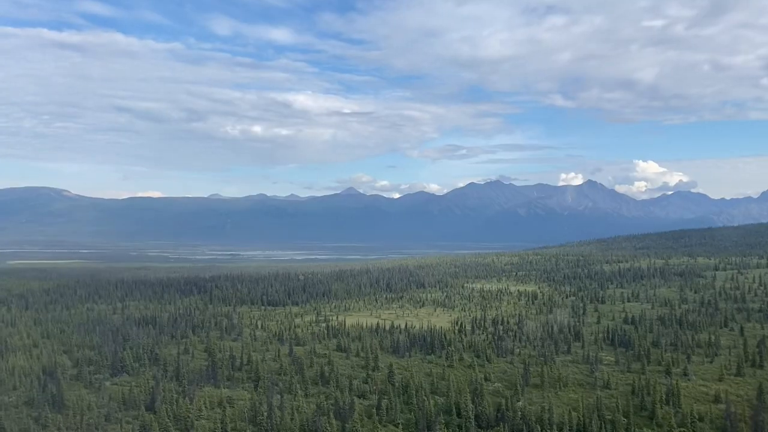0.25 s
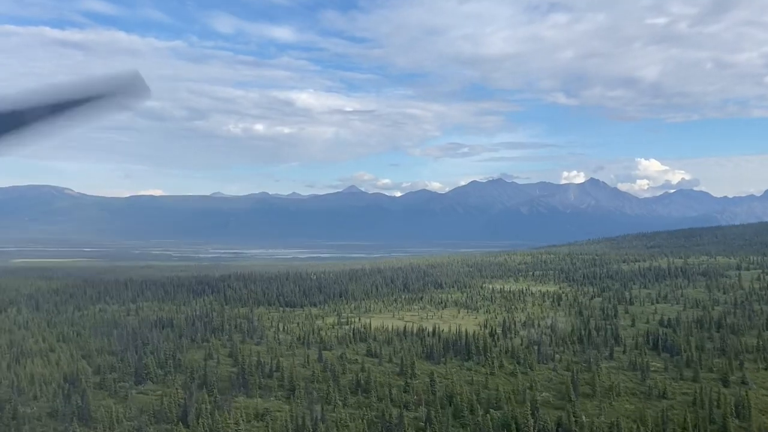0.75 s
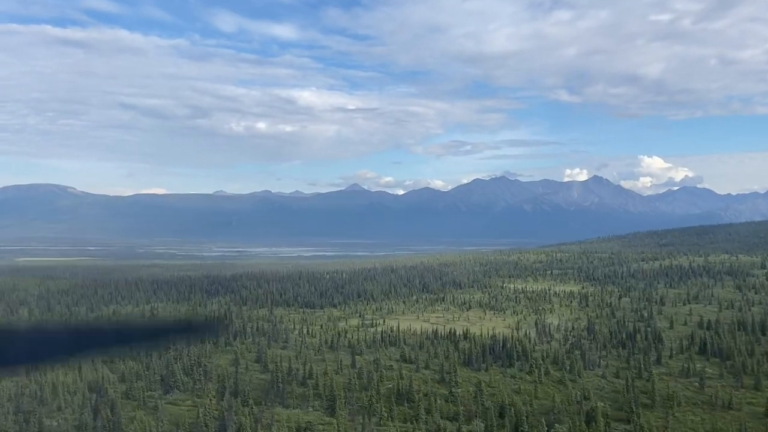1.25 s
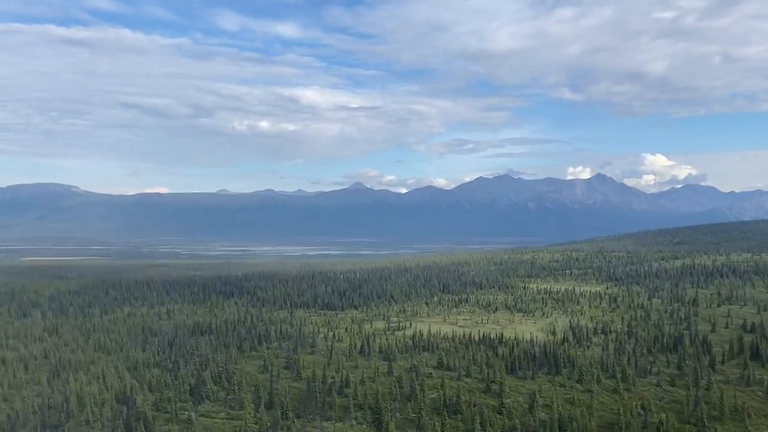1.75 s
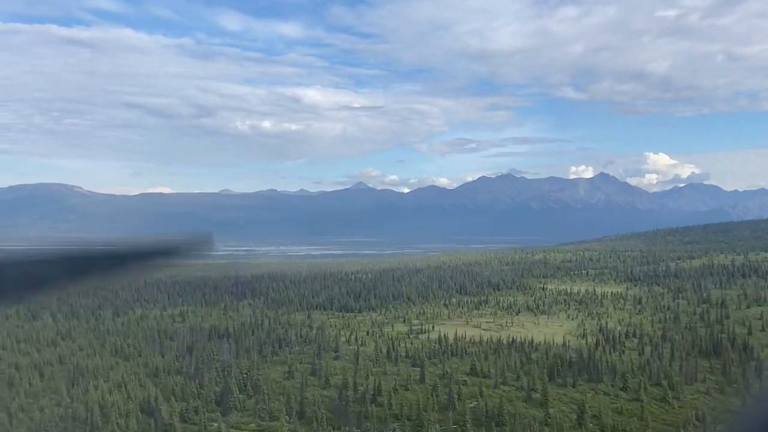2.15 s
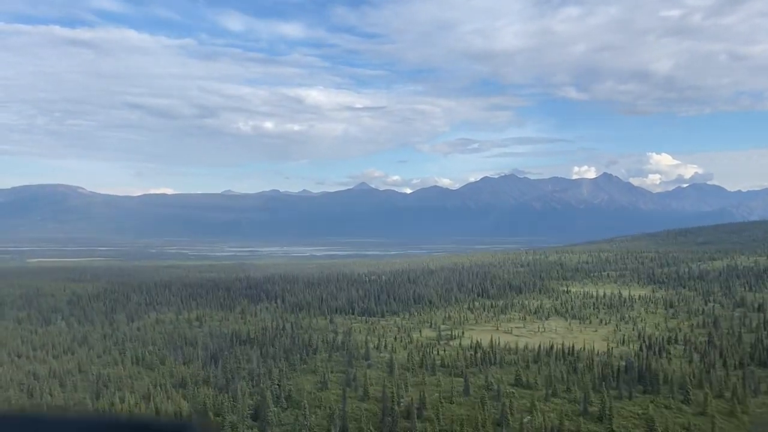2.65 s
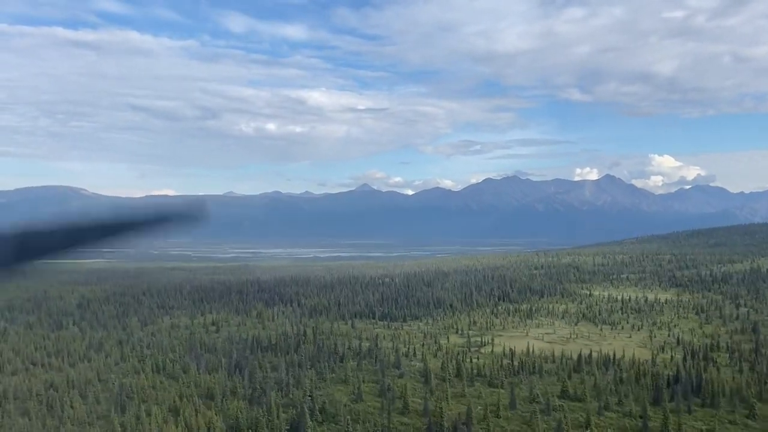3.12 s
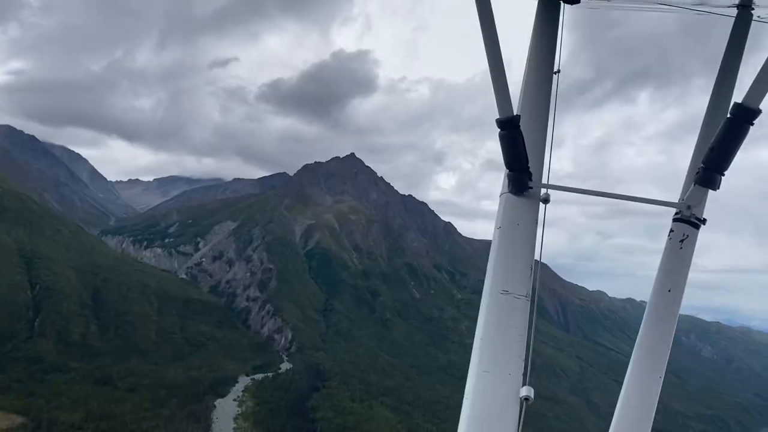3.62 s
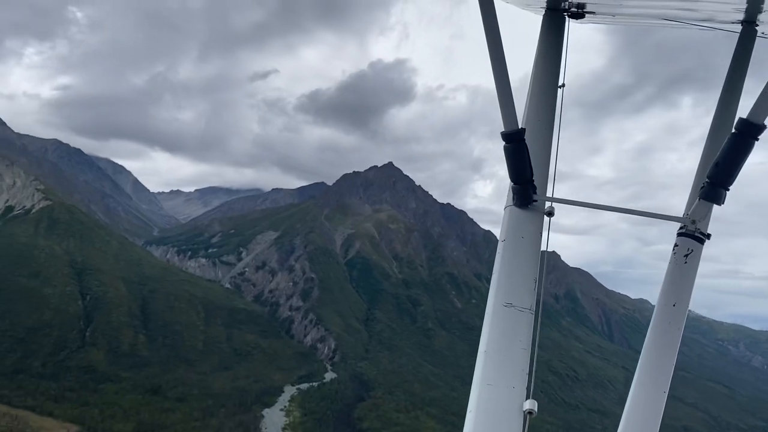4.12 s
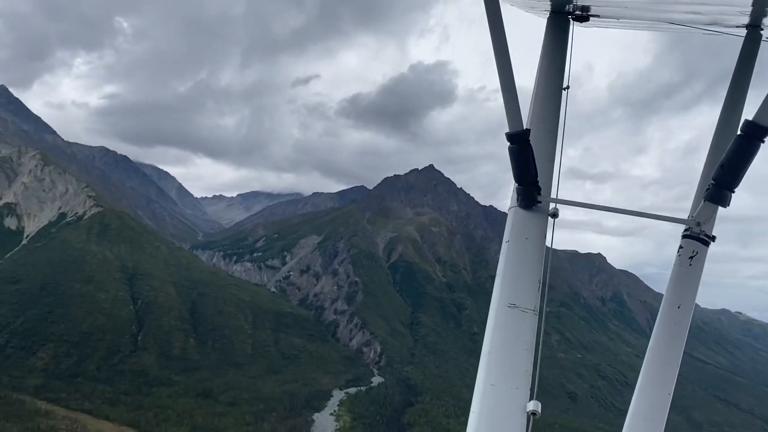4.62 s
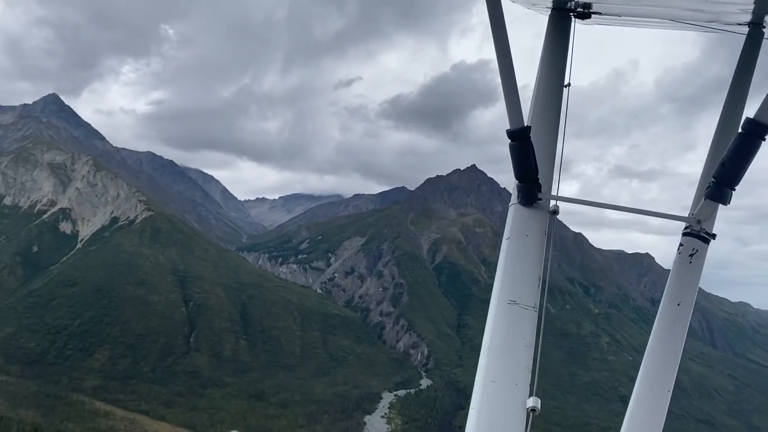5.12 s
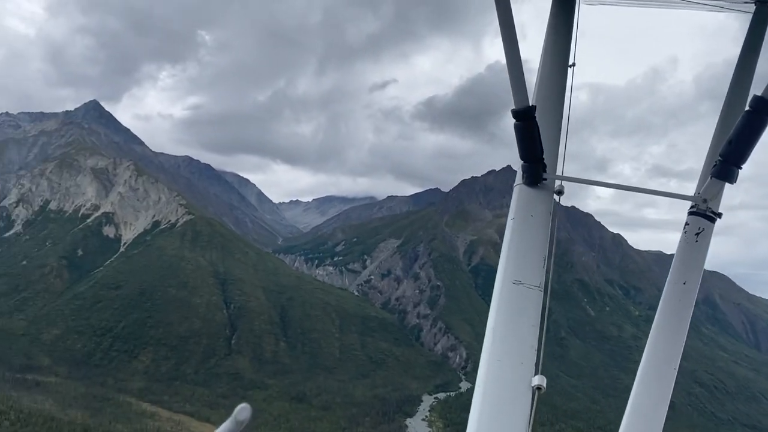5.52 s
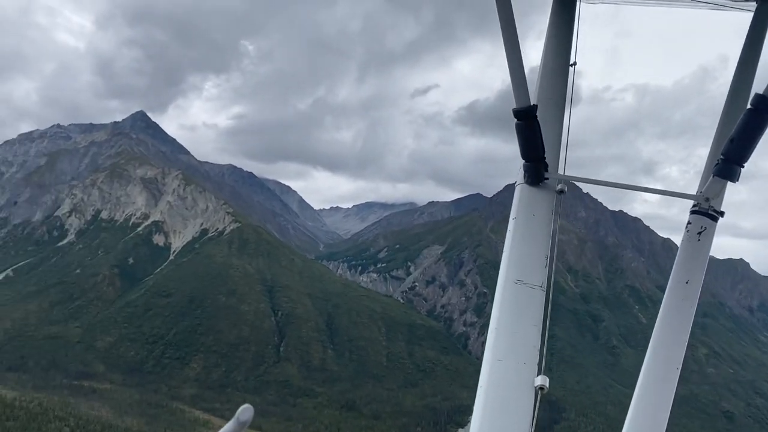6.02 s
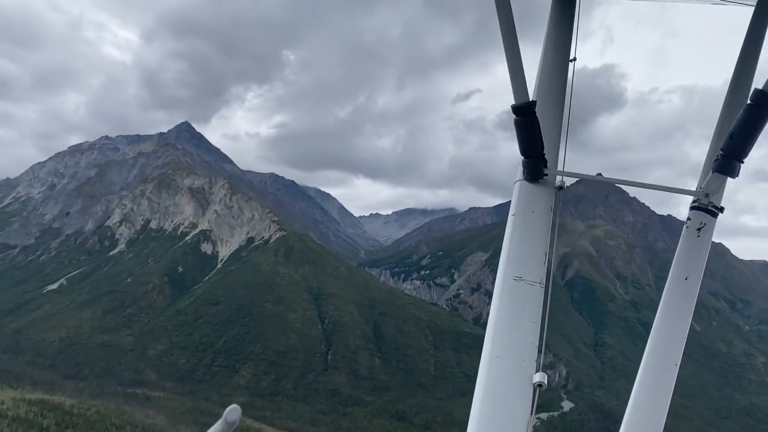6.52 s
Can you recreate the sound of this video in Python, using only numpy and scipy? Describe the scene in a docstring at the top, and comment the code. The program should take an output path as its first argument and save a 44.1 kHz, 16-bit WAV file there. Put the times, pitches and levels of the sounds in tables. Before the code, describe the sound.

From the start, a small piston-engine propeller plane is heard in flight from inside the cabin, in stereo, close behind the engine. Its deep, steady drone sits over rumbling air buffeting, a rough exhaust roar, faintly ringing window panes and a thin hiss from the seals. At about 3.4 seconds the sound cuts without a gap to a slightly faster, higher and thinner drone, with a slightly softer hiss. From here a loose fitting chatters rapidly, very high and fine, with scattered sharper ticks that are strongest between about 5.7 and 6.3 seconds. Near 5.4 seconds a jolt of rough air makes one short, low boom with a dull panel knock. The buffeting swells briefly around 5.8 seconds, and the engine drones on steadily until the end, at about 7 seconds.

```python
"""A stereo microphone in the cabin of a small four-cylinder propeller plane, close behind the engine.
First, low over forest: firings and blade passes make a deep drone, with buffeting air, exhaust roar,
ringing panes and the hiss of the seals under it. At 3.4 s the scene cuts to cruise among mountains:
a slightly faster, thinner drone with a slightly softer, thinner hiss of draught, while a loose fitting
chatters and ticks. Near 5.4 s a jolt of rough air booms and knocks the panels; the drone carries on."""
import sys
import numpy as np
from scipy import signal
from scipy.fft import rfft, irfft, next_fast_len
from scipy.io import wavfile
from scipy.ndimage import uniform_filter1d, minimum_filter1d

SR = 44100
rng = np.random.default_rng(int(sys.argv[2]) if len(sys.argv) > 2 else 0)


def wav_record(signal):
    """Record a signal, one row per channel, as 16-bit PCM in the file named by sys.argv[1]."""
    frames = np.transpose(np.atleast_2d(signal))
    bounded = np.clip(frames, -1, 1)
    # unit amplitude maps onto the largest positive 16-bit level
    quanta = np.round(bounded * 32767).astype(np.int16)
    wavfile.write(sys.argv[1], SR, quanta)


N = 298557
T = np.arange(N) / SR


def from_db(db):
    """Decibels to gain."""
    return 10 ** (np.asarray(db) / 20)


def in_time(rows):
    """A control curve at every sample."""
    return np.interp(T, *np.transpose(rows))


def drift(rate):
    """Smooth chance of spread 1 that changes about rate times a second."""
    step = 40   # samples
    pole = np.exp(-2 * np.pi * rate * step / SR)
    chance = rng.standard_normal(N // step + 2002)
    slow = signal.lfilter([1], [1, -2 * pole, pole * pole], chance)[2000:]
    return np.interp(np.arange(N) / step, np.arange(len(slow)), slow / slow.std())


def pan(db):
    """Left and right gains for a level difference, at constant power."""
    gains = from_db(np.array([[db], [-db]]) / 2)
    return gains / np.sqrt(np.mean(gains ** 2))


def colour(table, hz, mid, side):
    """Left and right spectra with the table's level and likeness; silent outside its range."""
    points, level_db, likeness = np.transpose(table)
    log_hz = np.log(np.maximum(hz, 1))
    gain = from_db(np.interp(log_hz, np.log(points), level_db)) * (hz >= points[0]) * (hz < points[-1])
    alike = np.clip(np.interp(log_hz, np.log(points), likeness), -1, 1)
    return gain * (np.sqrt((1 + alike) / 2) * mid + np.sqrt((1 - alike) / 2) * side * [[1], [-1]])


def air_noise(table, low_hz, high_hz, lag_s=0, right_gain=1):
    """A band of turbulence shaped by the table; it reaches the microphone's right side lag_s later."""
    size = next_fast_len(N)
    hz = np.arange(size // 2 + 1) * SR / size
    held = [(1, *table[0][1:]), *table, (SR, *table[-1][1:])]
    spectrum = colour(held, hz, *rfft(rng.standard_normal((2, size))))
    spectrum[1] *= right_gain * np.exp(-2j * np.pi * hz * lag_s)
    return irfft(spectrum * (hz >= low_hz) * (hz < high_hz), size)[:, :N] * np.sqrt(SR / 2)


# The engine at cruise. Each row: time in seconds, speed in revolutions per minute.
FOREST_RPM = [(0, 2304), (1.54, 2292), (1.91, 2290), (2.35, 2293), (2.66, 2289), (3.4, 2288)]
MOUNTAIN_RPM = [(3.45, 2377), (4.89, 2376), (5.55, 2386), (5.98, 2384), (6.76, 2374)]

def engine_cycles(rpm, wobble_rpm):
    """Count of four-stroke cycles, two crank turns each; uneven burning shakes the speed a little."""
    return np.cumsum(in_time(rpm) + wobble_rpm * drift(8)) / (120 * SR)


# Firings and blade passes, heard from the cabin. Each row: harmonic of the firing rate, level in dB,
# lower and upper sideband in dB against the tone, left over right in dB, left lead in radians.
FOREST_TONES = [(1, -21.4, -15, -21, 1, -0.68), (2, -36, 0, -6, 2, 0), (3, -24.5, -13, -9, 7, 0),
                (4, -35, -11.5, -5, 2.5, .5), (5, -41, -5, -4, 2, 0), (7, -42.5, -8.5, -4.5, -6.5, 0.5),
                (8, -38.3, -5, -10, -14, -2.5), (10, -47, -11, -4.5, -16, -1.5)]
MOUNTAIN_TONES = [(1, -32.5, -11, -15, -1.5, 1.7), (2, -24.5, -13, -9.5, -1.5, 0.07),
                  (3, -36.5, -6, -11, -2, 0.23), (4, -48, -9, -6, -4, 1.7), (5, -43, -9, -10, 2, 0.27),
                  (10, -52.5, -14, -10, 4, 1.4)]
# Cabin resonances at the microphone. Each row: centre in Hz, width in Hz, level of a line at the
# centre in dB, left over right in dB, left lead in radians.
FOREST_CABIN = [(125.4, 24, -37, 4, 0.5), (325, 14, -40.5, 2, 0), (401.6, 15, -38.5, 5, 0),
                (587, 35, -46, 5, 0.8), (668.8, 14, -47, -6, 1), (810.5, 26, -45.5, -3.5, 2.5),
                (859.5, 18, -43.9, -4, 1), (948, 25, -49, -11, -1.5), (1052, 21, -52.5, -10, 1),
                (1130, 79, -50, -8, 2.5), (1215, 28, -48.5, 5, 0), (1308, 28, -49, -1, -1.5),
                (1376, 24, -57, -11, 1.5), (1494, 17, -49, 9, -1), (1528, 20.1, -54.5, 6, 1),
                (1662, 18, -53.5, 4, -1.2), (1702, 16, -56.5, 0, 0)]
MOUNTAIN_CABIN = [(511.4, 41, -44, -1.5, 1.75), (594.2, 23, -46.5, 5, .7), (653.8, 40, -48.5, 6, 1.1),
                  (714.3, 14, -57, 7, .5), (853, 14, -56, 0, .5), (892, 16, -54.5, -5, 1.4),
                  (1040, 65, -54, 0, .3), (1161.7, 26, -53, 1, 2.8), (1263.4, 80, -52.5, 0, 0.43),
                  (1348, 22, -47.2, -7, 0.54), (1507, 16, -56, -4, 2.5), (1604, 22, -57.5, 0, 2),
                  (1775, 30, -56.5, 10, 1.3), (1875, 20, -51.5, -6, 0.73), (1945, 40, -57, -16, 1.1)]

def engine_orders(rpm, tones, cabin):
    """The strong lines: firing tones, sidebands from unequal cylinders, and lines the cabin lifts."""
    cycle_hz = in_time(rpm).mean() / 120
    lines = []
    for harmonic, db, below_db, above_db, *place in tones:
        multiple = 4 * round(harmonic)   # four firings per cycle
        for offset, relative_db in ((0, 0), (-1, below_db), (1, above_db)):
            lines.append((multiple + offset, db + relative_db, *place))
    for hz, width_hz, db, *place in cabin:
        for multiple in range(int((hz - width_hz) / cycle_hz) + 1, int((hz + width_hz) / cycle_hz) + 1):
            detuning = 2 * (multiple * cycle_hz - hz) / width_hz
            lines.append((multiple, db - 10 * np.log10(1 + detuning ** 2), *place))
    return list({line[0]: line for line in sorted(lines)}.values())   # each line's strongest path


def drone(cycles, orders, waver_db, rough, beat_smear):
    """Engine and propeller lines; weak ones waver most, high ones flare from firing to firing."""
    out = np.zeros((2, N))
    span = 25   # neighbouring lines that flare together
    burns = [drift(36) for _ in range(orders[-1][0] // span + 1)]
    loudest_db = max(row[1] for row in orders)
    phase, previous = 0, 0
    for multiple, line_db, pan_db, lead in orders:
        weakness = np.clip((loudest_db - line_db) / 20, .15, 1)
        flare = 1 + rough * min(multiple / 65, 1) * burns[multiple // span]
        gain = from_db(line_db + waver_db * weakness * drift(0.98)) * flare
        if multiple > 22:
            smear = .27   # upper lines bunch loosely into the burst of the hardest cylinder
        elif multiple == previous + 1:
            smear = beat_smear   # when small, sidebands follow their tone and it throbs
        else:
            smear = 1   # each low tone takes its own path
        phase += smear * rng.standard_normal()
        previous = multiple
        angle = 2 * np.pi * ((multiple * cycles + phase) % 1) + np.array([[lead], [-lead]]) / 2
        out += pan(pan_db) * gain * np.sqrt(2) * np.cos(angle)
    return out


# The engine's weaker lines. Each row: frequency in Hz, level per line in dB, left-right likeness.
FOREST_BUZZ = [(97,-51,.99),(145,-44,1),(190,-45,.9),(330,-50,.1),(420,-45,-.4),(520,-48.5,-.2),(735,-53,0),(950,-51,-.2),(1130,-53,-.2),(1450,-56,-.2),(1815,-60.5,.2),(2330,-71,.2),(3080,-76,.3)]
MOUNTAIN_BUZZ = [(95,-44,.95),(221,-50,.45),(300,-52,.6),(420,-53,.2),(560,-48,.1),(700,-54,.3),(950,-57,0),(1420,-58,0),(1700,-61,-.2),(1990,-63,0),(2300,-68,0),(3300,-72,.35)]

def buzz(cycles, table, orders, level_db, shift, rough, size=4096):
    """Four decaying exhaust bursts repeat every cycle; their paths through the cabin shift slowly."""
    position = np.arange(size) / size
    hz = np.arange(size // 2 + 1) * cycles[-1] / T[-1]
    bursts = np.exp(-3 * (4 * position % 1))
    out = np.zeros((2, N))
    for weight in (1, shift * drift(2.4), shift * drift(2.5)):
        phasors = np.exp(1j * np.angle(rfft(bursts * rng.standard_normal((2, size)))))
        lines = colour(table, hz, *phasors)
        lines[:, [round(row[0]) for row in orders]] = 0   # the drone plays these
        one_cycle = irfft(lines, size) * size / np.sqrt(2)
        out += weight * np.array([np.interp(cycles, position, side, period=1) for side in one_cycle])
    return out * from_db(level_db) * (1 + rough * drift(27))


def chuffing(cycles, firing_db, lope_db, grain_db, turn_db=0):
    """Gain of a pulsing flow: swells per firing and crank turn, a lope from unequal cylinders, chance."""
    angle = 2 * np.pi * cycles
    pulse_db = firing_db * np.sin(4 * angle) + turn_db * np.sin(2 * angle) + lope_db * np.cos(angle)
    gain = from_db(pulse_db + grain_db * drift(47))
    return gain / np.sqrt(np.mean(gain ** 2))


# Air buffeting the cabin skin. Each row: frequency in Hz, density in dB, left-right likeness.
FOREST_RUMBLE = [(20, -68, .97), (33, -50, .98), (47, -43.5, .98), (63.5, -42.5, 1), (267, -58.3, .87),
                 (314, -55, 1), (396, -57.3, .53), (474, -65, .24)]
MOUNTAIN_RUMBLE = [(20, -72, 0.4), (27, -62.5, 0.6), (40, -50.5, 0.44), (65, -38, 0.25), (109, -47, -0.15),
                   (158, -54.5, 0.36), (207, -56.5, -0.037), (277, -63.5, 0.042), (474, -63.5, -0.15)]

def rumble(table, gust_db, throb, boom_db, boom_pan_db, body_db, body_pan_db):
    """Gusts drive the deep boom; the cabin panels above it throb with the engine."""
    boom = air_noise(table, 15, 125) * from_db(boom_db + gust_db)
    body = air_noise(table, 125, 480) * throb * from_db(body_db)
    return boom * pan(boom_pan_db) + body * pan(body_pan_db)


# The exhaust, heard through the cabin. Each row: frequency in Hz, density in dB, left-right likeness.
FOREST_ROAR = [(484,-66,-.25),(567,-61.5,.23),(660,-62,0),(710,-66.5,.05),(796,-61,-.46),(844,-61.5,-.5),(900,-65.5,-.3),(1000,-67.5,-.15),(1140,-66,.04),
               (1300,-68.5,.15),(1530,-69.5,.3),(1670,-70.5,-.18),(1810,-71.5,.19),(2370,-78.5,.14),(2820,-77.5,.3),(3480,-80.5,.52)]
MOUNTAIN_ROAR = [(480,-64,.03),(610,-62.5,.3),(765,-68.5,.25),(850,-67,.34),(1210,-70,0),(1400,-70.5,.5),(1460,-73.5,.27),(1700,-74,-.19),(1790,-69.5,-.1),(2070,-74.5,.09),(2290,-77,-.3),(2780,-79.5,.17),(3170,-81,.55),(3360,-79.5,.5)]

def roar(table, flow, level_db, pan_db):
    """Turbulent exhaust in the middle range chuffs with the flow; the slipstream above is steadier."""
    exhaust = flow * air_noise(table, 480, 2100)
    slipstream = np.sqrt(flow) * air_noise(table, 2100, 3400)
    return (exhaust + slipstream) * from_db(level_db) * pan(pan_db)


# Panes and tubes around the microphone. Each row: pitch in Hz, width in Hz, level in dB,
# left-right likeness.
FOREST_RINGS = [(1672, 20, -53.5, -0.2), (1725, 20, -53.5, 0), (2330, 30, -58.5, 0), (2810, 50, -60, .7),
                (2920, 35, -61, .6), (3600, 35, -64, .5), (3700, 40, -65, .5), (3890, 100, -59.5, .5)]
MOUNTAIN_RINGS = [(1380, 35, -53, .3), (1603, 20, -55, -.3), (2500, 40, -57, .35), (2665, 20, -61, .3),
                  (2760, 20, -58.5, .5), (2820, 24, -54.5, .52), (2968, 38, -52.4, .65),
                  (3050, 28, -55.3, .65), (3190, 50, -59, .5)]

def rings(table, flow, wander, swell_db, surge_db):
    """Panes and tubes sing, shaken by the flow; flexing under the air load, they wander and swell."""
    out = np.zeros((2, N))
    for hz, width_hz, db, likeness in table:
        pole = np.exp(-np.pi * width_hz / SR)
        push = flow * from_db(surge_db * drift(14)) * rng.standard_normal((2, N))
        carrier = np.exp(2j * np.pi * np.cumsum(hz * (1 + wander * drift(1.34))) / SR)
        ringing = carrier * signal.lfilter([1], [1, -pole], push * carrier.conj())
        mid, side = ringing.real * from_db(swell_db * drift(1.6))
        sung = np.sqrt(1 + likeness) * mid + np.sqrt(1 - likeness) * side * [[1], [-1]]
        out += from_db(db) * sung / sung.std()
    return out


# Leaks at the nearby doors and windows. Each row: frequency in Hz, density in dB, left-right likeness.
FOREST_HISS = [(3400,-80,.45),(3920,-79.5,0.52),(4740,-83.5,0.24),(6200,-81.5,0.44),(8500,-86,1),(11200,-87.5,1),(15500,-91.5,1)]
MOUNTAIN_HISS = [(3400,-79.5,0.51),(4210,-82.5,0.58),(5300,-84.5,0.42),(6140,-86.5,0.97),(9600,-90,1),(11500,-88,1),(15600,-87.5,1)]

def hiss(table, level_db, pan_db, flutter_db, lag_s, right_gain, wash=1):
    """Draught through the seals, pulsing with any propeller wash; its top reaches one side first."""
    lower = wash * air_noise(table, 3400, 5500)
    top = np.sqrt(wash) * air_noise(table, 5500, 17000, lag_s, right_gain)
    return (lower + top) * from_db(level_db + flutter_db * drift(21)) * pan(pan_db)


def over_forest():
    """In the cabin, low over forest: a deep drone on the firing rate and its third harmonic."""
    cycles = engine_cycles(FOREST_RPM, wobble_rpm=1.2)
    flow = chuffing(cycles, firing_db=-1.5, lope_db=0.5, grain_db=1.0, turn_db=0.6)
    gust_db = 2.0 * drift(1.4)
    air = rumble(FOREST_RUMBLE, gust_db, flow, boom_db=-3.5, boom_pan_db=0.5, body_db=1.36, body_pan_db=1)
    air += roar(FOREST_ROAR, flow, level_db=-0.55, pan_db=-1.0)
    air += rings(FOREST_RINGS, flow, wander=.003, swell_db=1.2, surge_db=3.2)
    air += hiss(FOREST_HISS, level_db=-0.6, pan_db=-3.0, flutter_db=0.52, lag_s=.000165, right_gain=0.73)
    orders = engine_orders(FOREST_RPM, FOREST_TONES, FOREST_CABIN)
    engine = buzz(cycles, FOREST_BUZZ, orders, level_db=-4.0, shift=0.25, rough=0.35)
    engine += drone(cycles, orders, waver_db=1.9, rough=.2, beat_smear=1)
    return engine + air


# Spells of chatter from a loose fitting in the cabin. Each row: time in seconds, gain in dB.
CHATTER_SPELLS = [(3.5, -1.5), (4.0, -1.2), (4.35, .5), (4.55, -.8), (4.75, .5), (4.85, -1.5), (5.0, 1.5),
                  (5.17, -1.5), (5.35, 1.5), (5.7, -1.5), (5.95, 2), (6.3, -.5), (6.7, -1.5)]

def rattle(cycles, level_db, turn_db, contact_db, scatter_s, decay_s, edge_hz, contacts=5):
    """Each crank turn throws a loose fitting into a few scattered contacts of unequal force."""
    turns = 2 * (cycles - np.interp(5.865, T, cycles))   # one throw falls at 5.865 s
    throws = np.interp(np.arange(np.ceil(turns[0]) + 1, turns[-1] - 1), turns, T)[:, None]
    hit_s = throws + scatter_s * rng.standard_normal((len(throws), contacts))
    db = level_db + np.interp(hit_s, *np.transpose(CHATTER_SPELLS))
    db += turn_db * rng.standard_normal(throws.shape)
    db += contact_db * rng.standard_normal(hit_s.shape)
    energy = np.bincount((hit_s.ravel() * SR).astype(int), from_db(db).ravel() ** 2, N)[:N]
    envelope = np.sqrt(signal.lfilter([1], [1, -np.exp(-1 / (decay_s * SR))], energy))
    grit = .9 * rng.standard_normal(N) + .45 * rng.standard_normal((2, N))
    return signal.sosfilt(signal.butter(12, edge_hz, "high", fs=SR, output="sos"), envelope * grit)


# The fitting's hardest ticks, dead centre. Each row: start in seconds, level in dB, pitch in Hz.
TICKS = [(3.5951, -37, 11200), (4.326, -35, 11200), (4.3274, -35, 14900), (4.4776, -36, 14900),
         (4.6432, -35, 11200), (4.6562, -35, 14900), (5.0583, -37, 14900), (5.0852, -35, 11200),
         (5.3865, -35, 14900), (5.5123, -36, 14900), (5.6634, -31, 11000), (5.7642, -35, 11200),
         (5.8645, -33, 14900), (5.9667, -36, 14900), (6.0401, -33, 14200), (6.3184, -31, 11000)]

def ticks(level_db, decay_s, spread, size=1024):
    """Single hard contacts, each a short burst around its own pitch."""
    out = np.zeros(N)
    decay = np.exp(-np.arange(size) / (decay_s * SR))
    for start_s, db, hz in TICKS:
        burst = from_db(db + level_db) * decay * rng.standard_normal(size)
        band = signal.butter(2, [hz / spread, hz * spread], "band", fs=SR, output="sos")
        start = int(start_s * SR)
        out[start:start + size] += signal.sosfilt(band, burst)
    return out


# A boom, then a panel knock, heard from inside. Each row: start in seconds, pitch in Hz, level in dB,
# seconds to fall by 60 dB.
JOLTS = [(5.368, 72, -12.5, .16), (5.386, 335, -21, .08)]

def jolt():
    """A soft shove of rough air booms in the cabin and knocks its panels."""
    out = np.zeros(N)
    for start_s, hz, db, t60 in JOLTS:
        age = np.maximum(T - start_s, 0)
        attack = 1 - np.exp(-age / .008)
        out += 2 * attack * from_db(db - 60 * age / t60) * np.sin(2 * np.pi * hz * age)
    return out


# Slow swells of the buffeting and of the ringing panes. Each row: time in seconds, gain in dB.
ROUGH_AIR = [(3.5, -0.5), (3.8, -0.5), (4.3, -2.2), (4.6, 0), (4.9, -0.5), (5.2, 0.4), (5.5, -1),
             (5.8, 3.5), (6.1, -1.5), (6.4, -1), (6.7, 0)]
RING_SWELL = [(3.5, -0.9), (3.8, 0.44), (4.1, -0.9), (4.5, -0.099), (5.1, 0.1), (5.45, 0.6), (5.65, 0.9),
              (5.9, 1.1), (6.25, -0.92), (6.6, -0.1)]

def among_mountains():
    """In the cabin, among mountains: a thinner drone on twice the firing rate, gusts and a rattle."""
    cycles = engine_cycles(MOUNTAIN_RPM, wobble_rpm=1.4)
    flow = chuffing(cycles, firing_db=1.1, lope_db=0.6, grain_db=1.24, turn_db=0.9)
    gust_db = in_time(ROUGH_AIR)
    air = rumble(MOUNTAIN_RUMBLE, gust_db, flow, boom_db=-3, boom_pan_db=1, body_db=0.5, body_pan_db=-4)
    air += roar(MOUNTAIN_ROAR, flow, level_db=-0.16, pan_db=-0.7)
    panes = rings(MOUNTAIN_RINGS, flow, wander=.003, swell_db=0.8, surge_db=2.2)
    air += from_db(in_time(RING_SWELL)) * panes
    wash = chuffing(cycles, firing_db=0.8, lope_db=0.4, grain_db=0.3)
    air += hiss(MOUNTAIN_HISS, level_db=-0.5, pan_db=1.5, flutter_db=0.45,
                lag_s=-.000225, right_gain=-1.19, wash=wash)
    fitting = rattle(cycles, level_db=-39.0, turn_db=1.7, contact_db=2.4,
                     scatter_s=.0016, decay_s=.0013, edge_hz=13900)
    fitting += ticks(level_db=4.0, decay_s=.0016, spread=1.12)
    orders = engine_orders(MOUNTAIN_RPM, MOUNTAIN_TONES, MOUNTAIN_CABIN)
    engine = buzz(cycles, MOUNTAIN_BUZZ, orders, level_db=-3.0, shift=0.14, rough=0.41)
    engine += drone(cycles, orders, waver_db=1.4, rough=.27, beat_smear=.17)
    return engine + air + fitting + jolt()


def scene():
    """Forest gives way to mountains in a quick crossfade."""
    cut_s, fade_s = 3.425, 0.029
    fade = np.pi / 2 * np.clip((T - cut_s) / fade_s + .5, 0, 1)
    return np.cos(fade) * over_forest() + np.sin(fade) * among_mountains()


def record(dry):
    """After the microphone a quick limiter holds down the drone's tallest beats; the top is cut steeply."""
    ceiling, reaction_s, cutoff_hz = .375, .016, 15750
    size = int(reaction_s * SR)
    allowed = np.minimum(1, ceiling / (np.abs(dry).max(axis=0) + 1e-9))
    gain = uniform_filter1d(minimum_filter1d(allowed, size), size)
    return signal.sosfilt(signal.ellip(10, .1, 80, cutoff_hz, fs=SR, output="sos"), gain * dry)


dry = scene()
out = record(dry)
wav_record(out)
```